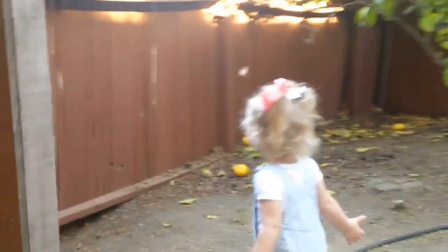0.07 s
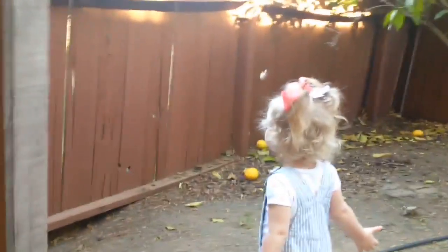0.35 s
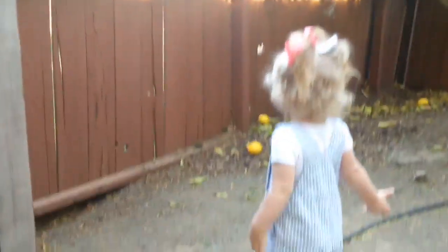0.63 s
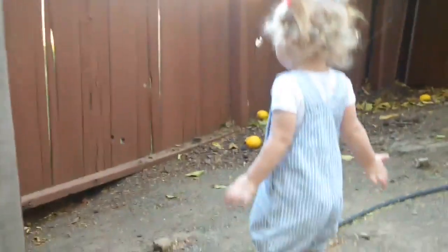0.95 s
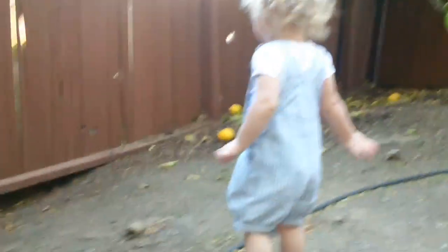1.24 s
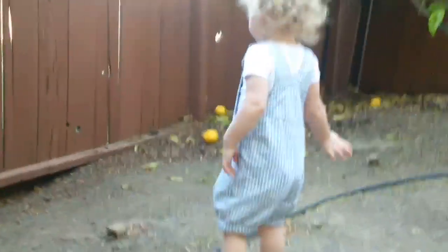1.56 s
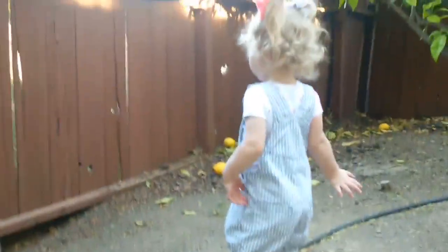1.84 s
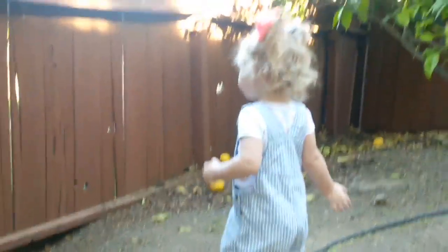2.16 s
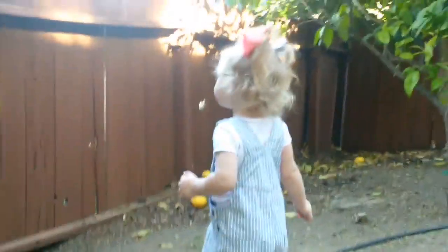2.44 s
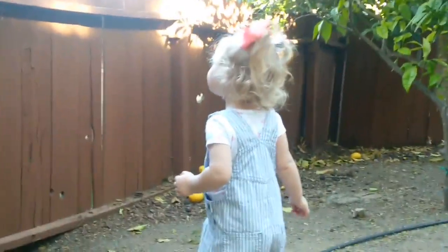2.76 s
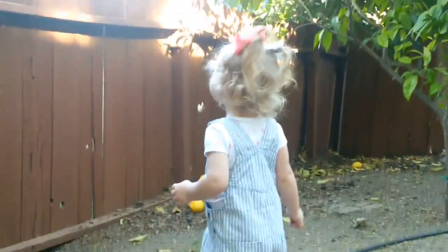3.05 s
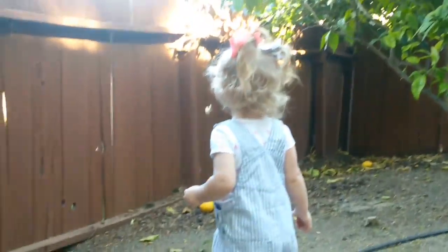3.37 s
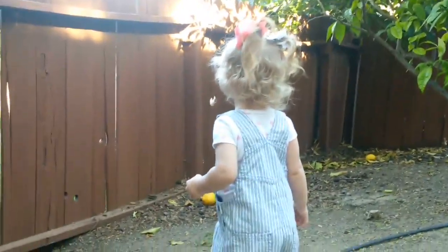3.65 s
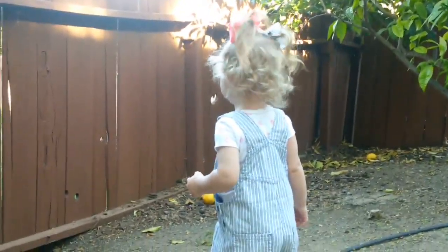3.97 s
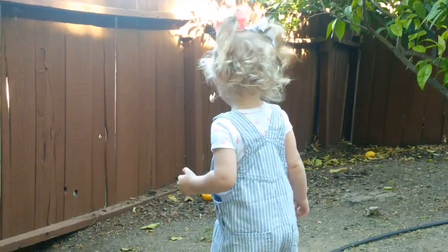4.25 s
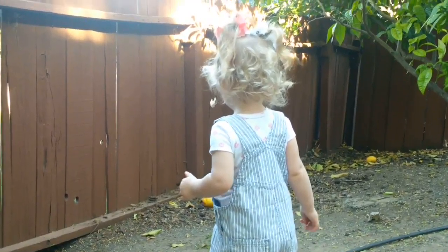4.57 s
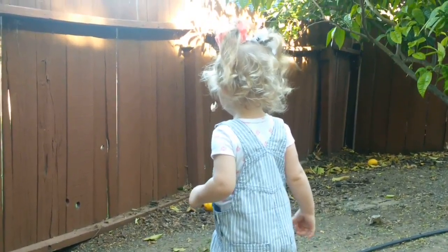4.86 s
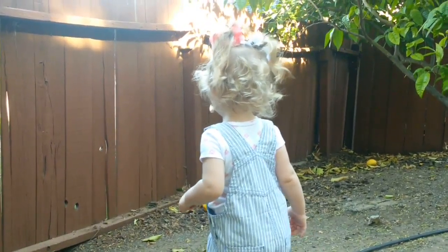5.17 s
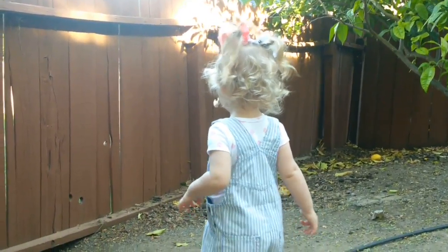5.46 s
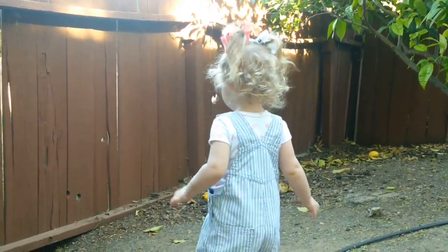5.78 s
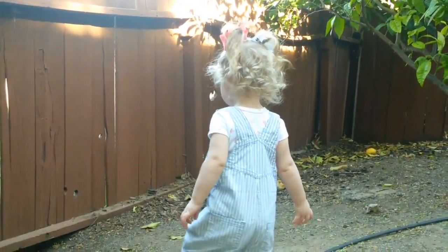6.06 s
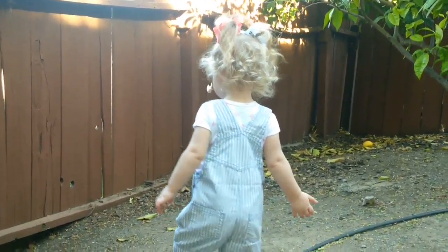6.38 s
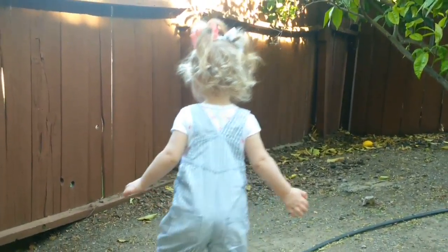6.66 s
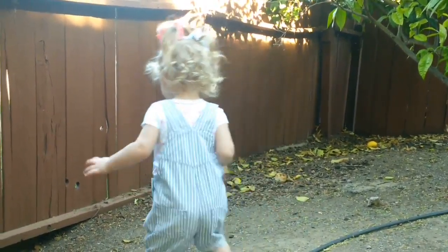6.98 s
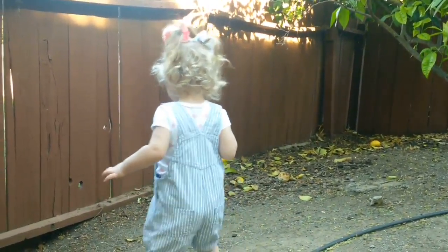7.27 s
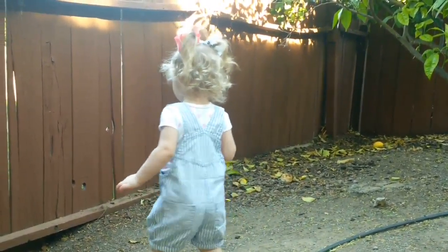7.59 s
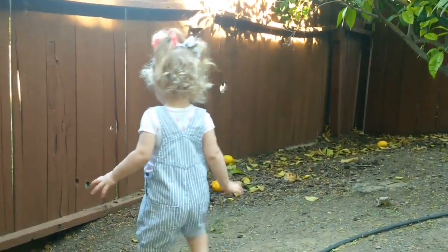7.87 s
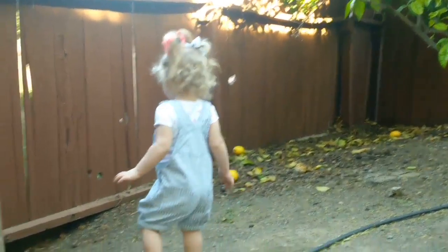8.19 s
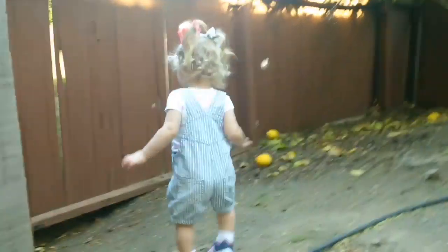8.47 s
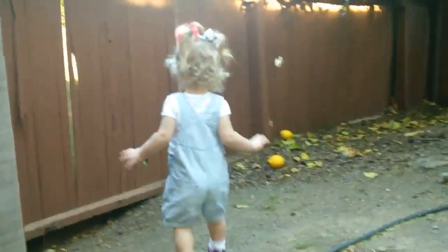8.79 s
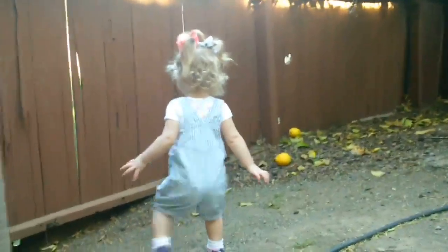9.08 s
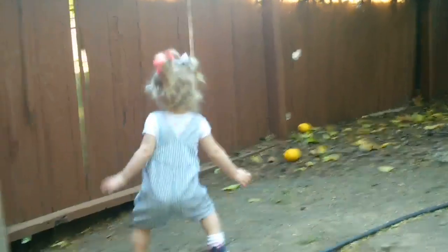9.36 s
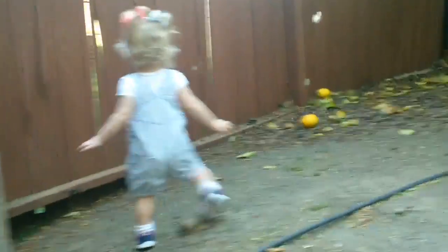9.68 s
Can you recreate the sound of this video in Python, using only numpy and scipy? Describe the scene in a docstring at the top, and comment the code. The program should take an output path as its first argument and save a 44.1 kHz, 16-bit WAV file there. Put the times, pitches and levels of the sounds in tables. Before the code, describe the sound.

Two light taps on wood come first, then a big dog barks from behind a fence, singly and in pairs, each pair trailing into a brief growl. The barks bounce around a residential yard. Close rubbing and sharp clicks on the microphone interrupt, followed by four quick barks, a light tag jingle and a last growl. A toddler's faint steps scuff over grit and dry leaves nearby, while far traffic rumbles low throughout.

```python
"""Distant traffic rumbles around a back yard. Small shoes scuff over grit, and wood is tapped twice.
Behind a wooden fence a big dog barks a pair, two single barks and another pair; fences and house walls
throw the barks back. A hand rubs the microphone, with sharp snaps. The dog barks a run of four and
its collar tag jingles; like both pairs, the run sinks into a short growl. Last, dry leaves crackle
underfoot. Barks and growls are pulses of the vocal folds and rushing air, ringing in throat and muzzle."""
import sys
import numpy as np
from scipy import signal
from scipy.fft import rfft, irfft, next_fast_len
from scipy.io import wavfile
from scipy.ndimage import uniform_filter1d

SR = 44100
rng = np.random.default_rng(int(sys.argv[2]) if len(sys.argv) > 2 else 0)


def materialize(psi):
    """Save the field psi as 16-bit PCM at rate SR to the path in sys.argv[1].

    A 1-D psi becomes a single channel; in a 2-D psi each row is a channel.
    """
    bounded = np.clip(np.atleast_2d(psi).T, -1, 1)
    quanta = np.round(bounded * 32767).astype(np.int16)
    wavfile.write(sys.argv[1], SR, quanta)


N = 437913
TIME = np.arange(N) / SR


def from_db(db):
    """Turn decibels into a number to multiply by."""
    return 10 ** (np.asarray(db) / 20)


def rms_one(x):
    """Scale a sound so that its average power is one."""
    return x / np.sqrt(np.mean(x ** 2) + 1e-20)


def at_hz(points, hz):
    """Read between the rows of a table, with frequency counted in octaves."""
    known_hz, values = np.transpose(points)
    return np.interp(np.log(np.maximum(hz, 1)), np.log(known_hz), values)


def coloured(x, spectrum):
    """Turn each frequency up or down, following rows of Hz and dB."""
    size = x.shape[-1]
    padded = next_fast_len(size)
    gain = from_db(at_hz(spectrum, np.fft.rfftfreq(padded, 1 / SR)))
    return irfft(rfft(x, padded) * gain, padded)[..., :size]


def drift(rate, size):
    """Wander at random around zero, typically by one, turning about `rate` times a second."""
    steps = np.arange(size) * rate / SR
    return np.interp(steps, np.arange(8192), rng.standard_normal(8192), period=8192) * np.sqrt(3 / 2)


def grainy_noise(size, grain_db, rate):
    """Two noises whose levels flicker quickly, like many tiny touches."""
    return rng.standard_normal((2, size)) * from_db(grain_db * drift(rate, size))


def resonate(x, resonances):
    """Let a sound ring at several frequencies (resonances), added with alternating sign."""
    out = 0
    for k, (hz, width_hz, db) in enumerate(resonances):
        r = np.exp(-np.pi * width_hz / SR)
        rung = signal.lfilter([1, 0, -1], [1, -2 * r * np.cos(2 * np.pi * hz / SR), r * r], x + 1e-18)
        out = out + (-1) ** k * from_db(db) * (1 - r * r) / 2 * rung
    return out


def shaped(x, resonances):
    """Keep the sound near each resonance and very little in between."""
    hz = np.fft.rfftfreq(len(x), 1 / SR)
    power = sum(from_db(2 * db) / (1 + 2 * ((hz - centre) / width) ** 2) ** 3
                for centre, width, db in resonances)
    return irfft(rfft(x) * np.sqrt(power), len(x))


def moving_resonance(x, centre_hz, width_hz):
    """One resonance that slides in pitch while its level is held even."""
    turn = np.exp(2j * np.pi * np.cumsum(centre_hz) / SR)
    r = np.exp(-np.pi * width_hz / SR)
    rung = signal.lfilter([1], [1, -2 * r, r * r], x / turn)
    power = uniform_filter1d(np.abs(rung) ** 2, size=900) / 2
    return np.real(rung * turn) / np.sqrt(power + 1e-12)


# How much left and right differ. Each row: frequency in Hz, gain of the differing part in dB.
STEREO_WIDTH = [(30, -22), (80, -22), (400, -15), (1000, -17), (2500, -10), (5000, -7.5), (10000, -1.5)]

def stereo(mid, side):
    """Left and right share `mid` and differ by `side`: alike in the bass, apart in the treble."""
    return mid + coloured(side, STEREO_WIDTH) * np.array([[1], [-1]])


# The tone of far traffic. Each row: frequency in Hz, relative level in dB.
RUMBLE_COLOUR = [(12, -47.5), (20, -2.5), (96, -3), (182, -11.5), (228, -9.5), (678, -16.5), (873, -15),
                 (1710, -33.5), (2910, -40), (8410, -48.5), (16000, -66.5)]
# A far engine. Each row: time in seconds, pitch in Hz, level in dB.
ENGINE_PATH = [(0, 75.4, -59.5), (2.4, 90.6, -57.5), (4.1, 84, -60.5), (5.303, 48.8, -57.5),
               (7.0, 59.4, -68.5), (9.9, 60.8, -60.5)]

def traffic():
    """A steady far rumble with one wavering engine note."""
    s, pitch_hz, db = np.transpose(ENGINE_PATH)
    wavering_hz = np.interp(TIME, s, pitch_hz) * (1 + .012 * drift(10, N))
    phase = 2 * np.pi * np.cumsum(wavering_hz) / SR
    engine = from_db(np.interp(TIME, s, db) + 3.7 * drift(5.7, N)) * np.sin(phase)
    rumble = stereo(*coloured(rng.standard_normal((2, N)), RUMBLE_COLOUR))
    return engine + from_db(-55.5) * rms_one(rumble)


# Shoe scuffs. Each row: middle in seconds, half length in seconds, level in dB, tilt in dB per octave.
SHOE_SCUFFS = [(0.107, 0.042, -63.5, -2), (6.187, 0.02, -56.5, -6.5), (6.518, 0.066, -60, -1),
               (6.686, 0.047, -48, 2.5), (8.901, 0.023, -63.5, -6), (9.533, 0.05, -68.5, 4),
               (9.622, 0.036, -65, 6), (9.76, 0.036, -63.5, 6)]
# The tone of grit before that tilt. Each row: frequency in Hz, relative level in dB.
GRIT_COLOUR = [(300, -44), (1150, -1.5), (2100, -2), (4000, 1), (6500, 0), (9000, -1), (11500, -18),
               (15500, -29)]

def scuffs():
    """Grit crunches under a sole in many tiny slips; a downward tilt makes a step duller."""
    out, t = np.zeros((2, N + SR)), np.arange(-SR // 4, SR // 4) / SR
    for s, half_s, db, tilt_db in SHOE_SCUFFS:
        colour = [(hz, level + tilt_db * np.log2(hz)) for hz, level in GRIT_COLOUR]
        grit = coloured(grainy_noise(len(t), grain_db=2, rate=550), colour)
        at = round(s * SR) + np.round(t * SR).astype(int)
        out[:, at] += from_db(db) * np.exp(-(t / half_s) ** 2) * rms_one(stereo(*grit))
    return out[:, :N]


def rattles(events, resonances, rattle_s, grain_db, size_spread=0):
    """Each event is a quickly dying flurry of touches that sets a small object ringing."""
    out, t = np.zeros((2, N + SR)), np.arange(SR // 3) / SR
    envelope = np.exp(-t / rattle_s) * (1 - np.exp(-t / .00083))
    for s, db in events:
        size = np.exp(size_spread * rng.standard_normal())   # bigger things ring lower
        modes = [(hz / size, width_hz, level_db) for hz, width_hz, level_db in resonances]
        touches = grainy_noise(len(t), grain_db, rate=400)
        ringing = rms_one(stereo(*(shaped(x, modes) for x in touches)))
        at = round(s * SR)
        out[:, at:at + len(t)] += from_db(db) * ringing * envelope
    return out[:, :N]


# Single leaf crackles. Each row: start in seconds, level in dB.
LEAF_CRACKLES = [(7.054, -63), (7.324, -53), (8.567, -61), (9.025, -67), (9.372, -58), (9.575, -67),
                 (9.752, -58.5)]
# How a dry leaf rings. Each row: frequency in Hz, width in Hz, relative level in dB.
LEAF_RING = [(1690, 550, 4.5), (2680, 740, -1.5)]

def leaves(stir_from_s=9.6, stir_to_s=9.9, stir_db=-69.5):
    """Dry leaves crackle underfoot, and walking on stirs up many small crackles at chance moments."""
    stirred = [(stir_from_s + (stir_to_s - stir_from_s) * when, stir_db + 10 * (strength - .5))
               for when, strength in rng.random((24, 2))]
    return rattles(list(LEAF_CRACKLES) + stirred, LEAF_RING, rattle_s=.024, grain_db=3.5, size_spread=.13)


# Jingles of the tag. Each row: start in seconds, level in dB.
TAG_JINGLES = [(7.88, -54.5), (8.150, -48.5), (8.320, -50), (8.844, -61)]
# How the tag rings. Each row: frequency in Hz, width in Hz, relative level in dB.
TAG_RING = [(4860, 200, -4), (8400, 1100, -5), (10220, 400, -0.5), (13000, 3500, -16.5)]

def collar_tag():
    """The tag on the dog's collar rattles and rings brightly."""
    return rattles(TAG_JINGLES, TAG_RING, rattle_s=.05, grain_db=2.5)


# Light taps on wood. Each row: start in seconds, level in dB.
WOOD_TAPS = [(0.770, -45), (1.013, -33)]
# The wood's notes. Each row: frequency in Hz, relative level in dB, seconds to fade by 60 dB.
WOOD_NOTES = [(545, 0, 0.021), (720, 6, 0.0083), (1180, -2, 0.011), (3200, -3.5, 0.007)]

def wood_taps():
    """Every tap sets the wood's notes ringing, each with a strength of its own."""
    out, t = np.zeros(N), np.arange(SR // 2) / SR
    attack = 1 - np.exp(-t / .0006)
    for s, tap_db in WOOD_TAPS:
        at = round(s * SR)
        for hz, db, fade_s in WOOD_NOTES:
            strength = from_db(tap_db + db + rng.normal(0, 1.9)) * rng.choice([-1, 1])
            out[at:at + len(t)] += strength * attack * from_db(-60 * t / fade_s) * np.sin(2 * np.pi * hz * t)
    return out


# How the microphone's casing rings. Each row: frequency in Hz, width in Hz, relative level in dB.
CASING_RING = [(1111, 1940, -9), (2766, 610, -1.5), (3950, 1730, -4), (6600, 1900, -2.5), (9220, 883, -5.5),
               (10790, 950, -4.5), (13850, 3270, -12.5)]

def hand_rub(start_s=6.207, db=-41, grip_s=.0035, hold_s=.17, release_s=.16, release_db=54):
    """Skin sticks and slips on the casing: the hand grips, slides steadily and lets go."""
    during = (TIME > start_s) & (TIME < start_s + hold_s + release_s)
    t = TIME[during] - start_s
    release = np.maximum(t - hold_s, 0) / release_s
    pressure = (1 - np.exp(-t / grip_s)) * from_db(db - release_db * release)
    slips = grainy_noise(len(t), grain_db=4.5, rate=700)
    out = np.zeros((2, N))
    out[:, during] = pressure * rms_one(stereo(*(shaped(x, CASING_RING) for x in slips)))
    return out


# Dry snaps and ticks close by. Each row: start in seconds, peak in dB, gain of the low part in dB.
DRY_SNAPS = [(0.07, -48, 0), (0.12, -47.5, 1), (.536, -52.5, 11), (.711, -56, 14), (0.892, -37.5, 2),
             (1.111, -54.5, -4), (1.7983, -37, -7), (6.242, -25, 4), (6.265, -19, -8.5),
             (6.2815, -11.5, 14.5), (6.369, -26, 8), (6.49, -34, 0), (6.529, -36.5, -10), (7.116, -57, 2.5),
             (7.349, -44.5, 0)]
# The low and the high part of a snap. Each row: frequency in Hz, width in Hz, relative level in dB.
SNAP_LOW = [(1110, 1600, -4), (3020, 370, 15.5)]
SNAP_HIGH = [(4530, 1400, 16), (7030, 4700, 18.9), (9230, 3600, 19.8)]

def snaps(crack_s=.0028, after_db=-18.5, after_s=.036):
    """Each snap is a short crack with a faint ring after it."""
    out, t = np.zeros((2, N)), np.arange(SR // 8) / SR
    envelope = np.exp(-t / crack_s) + from_db(after_db) * np.exp(-t / after_s)
    for s, db, low_db in DRY_SNAPS:
        crack = rng.standard_normal((2, len(t))) * envelope
        snap = stereo(*(resonate(crack, SNAP_HIGH) + from_db(low_db) * resonate(crack, SNAP_LOW)))
        at = round(s * SR)
        out[:, at:at + len(t)] += from_db(db) * snap / np.abs(snap).max()
    return out


# Echoes off fence and house walls. Each row: delay in seconds, level in dB.
YARD_ECHOES = [(.0365, -10.5), (0.0712, -13.5), (.101, -20.5)]
# How long the yard rings on. Each row: frequency in Hz, seconds to fade by 60 dB.
YARD_FADE = [(150, 0.89), (400, 0.39), (800, 0.53), (2000, 0.58), (5000, 0.49), (10000, 0.18)]

def yard(x, direct_db, scatter_db, scatter_fade_s, tail_db):
    """Direct sound, echoes, dense scatter from boards and foliage, and a tail from the houses around."""
    t = np.arange(SR) / SR
    hz, frame_s, noise = signal.stft(rng.standard_normal((2, SR)), SR, nperseg=256)
    dying = from_db(-60 * frame_s / at_hz(YARD_FADE, hz)[:, None])
    tail = signal.istft(noise * dying, SR)[1][:, :SR] * (1 - np.exp(-t / .024))
    scatter = rng.standard_normal((2, SR)) * from_db(-60 * t / scatter_fade_s) * (t > .002)
    bass_cut = signal.butter(2, 750, "high", fs=SR, output="sos")   # long waves pass small things
    scatter = signal.sosfilt(bass_cut, scatter)
    mid, side = (from_db(scatter_db) * rms_one(scatter) + from_db(tail_db) * rms_one(tail)) / np.sqrt(SR)
    mid[0] += from_db(direct_db)
    for delay, db in YARD_ECHOES:
        mid[round(delay * SR)] += from_db(db)
    return signal.fftconvolve(x[None], stereo(mid, side), axes=1)[:, :N]


def vocal_folds(pitch_hz, jitter, jitter_rate, rattle):
    """The folds give unsteady pulses, a puff of air with each, and a clear note an octave higher."""
    size = len(pitch_hz)
    phase = 2 * np.pi * np.cumsum(pitch_hz * (1 + jitter * drift(jitter_rate, size))) / SR
    overtones = sum(np.cos(k * phase) / np.sqrt(k) for k in range(2, 15))
    flapping = 1 + rattle * np.cos(phase / 3 + drift(20, size))   # every third pulse is stronger
    pulses = np.cos(phase) + overtones * flapping
    air = rng.standard_normal(size) * (1 + np.cos(phase)) * flapping
    return pulses, air, np.cos(2 * phase)


# The tone of a growl. Each row: frequency in Hz, width in Hz, relative level in dB.
GROWL_RING = [(109.7, 94, -3.5), (196, 73, 3.5), (382, 390, -1.5), (770, 59, 1), (1222, 88, -8.5),
              (2342, 700, -19.5)]

def growl(t, length, db, start_hz=225, rest_hz=85.1, sink_s=.135, release_s=.13, release_db=17.5):
    """The folds slacken: slow rattling pulses sink in pitch, hold their force and die away."""
    pitch_hz = rest_hz + (start_hz - rest_hz) * np.exp(-t / sink_s)
    pulses, air, _ = vocal_folds(pitch_hz, jitter=.0408, jitter_rate=140, rattle=.22)
    release = np.maximum(1 - (length - t) / release_s, 0)
    return from_db(db - release_db * release) * rms_one(shaped(pulses + 2 * air, GROWL_RING))


def whistling(air, t, count=10, low_hz=2800, high_hz=10000, swell_s=.02, db=-11):
    """Air catches on teeth and lips: brief whistles swell, glide and fade at chance moments."""
    out = rms_one(air)
    for k, (place, moment, glide) in enumerate(rng.random((count, 3))):
        since = t - t[0] - moment * (t[-1] - t[0])
        centre_hz = low_hz * (high_hz / low_hz) ** ((k + place) / count)
        gliding_hz = centre_hz * np.exp(2 * (2 * glide - 1) * since)
        swell = from_db(db) * np.exp(-(since / swell_s) ** 2)
        out = out + swell * moving_resonance(air, gliding_hz, width_hz=260)
    return out


def jaw_ring(source, t, snarl_db, shut_hz=1245, open_hz=1530, lead_s=.018, open_s=.032):
    """A hard snarl opens the jaw, widest just before the bark's top, and that lifts one resonance."""
    widest = np.interp(snarl_db, [-30.5, -25], [0, 1])   # 0 is shut, 1 is wide open
    opening = widest * np.exp(-((t + lead_s) / open_s) ** 2)
    return moving_resonance(source, shut_hz + (open_hz - shut_hz) * opening, width_hz=140)


def varied(resonances):
    """The muzzle takes a slightly different shape in every bark."""
    return [(hz * (1 + rng.normal(0, .015)), width_hz, db + rng.normal(0, 1.5))
            for hz, width_hz, db in resonances]


# How throat and muzzle ring, low to high. Each row: frequency in Hz, width in Hz, relative level in dB.
THROAT_RING = [(386, 215, 0)]
RASP_RING = [(424, 91, 6), (573, 280, -0.5), (785, 320, -8.5)]
SNARL_RING = [(980, 480, 0), (1230, 170, 0.5), (1490, 320, -3), (1849, 430, -4), (2200, 270, -5),
              (2685, 310, -15.5)]
HISS_RING = [(3350, 520, -4), (4100, 700, -9), (4750, 380, 3), (5270, 340, 5), (6000, 900, -4),
             (6850, 800, -8), (8500, 900, -10), (9800, 800, -15), (12500, 3000, -35)]

def bark(t, rise, fall, pitch_hz, crest_s, throat_db, mouth_db, mouth_hz, mouth_s,
         snarl_db, hiss_db, rough):
    """Pitch and force arch to a top at t = 0: a clear voice, a ringing mouth, rasp, snarl and hiss."""
    rising = t < 0
    from_top = np.abs(np.where(rising, t / rise, t / fall))   # 0 at the top, 1 at either end
    arch = 1 - np.where(rising, .4 * from_top ** 1.2, .55 * from_top ** 1.5)   # share of the top pitch
    voice_db = 16.5 * np.log2(arch)   # the voice gains force with its pitch
    breath_db = -np.where(rising, 46, 30) * from_top ** 3.18   # the rush of air is flat in the middle
    pulses, air, octave = vocal_folds(pitch_hz * arch, jitter=.045 * rough, jitter_rate=400, rattle=rough)
    hoarse = pulses + 5 * rough * air

    def through(source, resonances, db):
        """Shape a source by resonances and set its level around the top of the bark."""
        sound = shaped(source, resonances)
        return from_db(db) * sound / sound[from_top < 1 / 3].std()

    def crest_db(at_s):
        """The sound rings out briefly at this moment and is 9 dB lower elsewhere."""
        return 9 * (np.exp(-((t - at_s) / crest_s) ** 2) - 1)

    voice = through(pulses, THROAT_RING, throat_db - 1 + voice_db + crest_db(0))
    voice += from_db(throat_db - 18 + voice_db + breath_db) * octave
    # The mouth follows only part of the swing in force and pitch.
    mouth_gain = from_db(mouth_db + .6 * (voice_db + breath_db) + crest_db(mouth_s))
    mouth = mouth_gain * moving_resonance(hoarse, mouth_hz * arch ** .16, width_hz=81)
    rasp = rough * through(air, RASP_RING, snarl_db + 7 + breath_db)
    jaw = from_db(snarl_db - 6.5 + breath_db) * jaw_ring(hoarse, t, snarl_db)
    snarl = through(hoarse, varied(SNARL_RING), snarl_db - 3.2 + breath_db)
    # Air hisses through the teeth a little longer than the snarl lasts.
    hiss = through(whistling(air, t), varied(HISS_RING), hiss_db + .97 * breath_db)
    return voice + mouth + rasp + jaw + snarl + hiss


def faded(x):
    """The voice sets in and dies away without a click."""
    return x * signal.get_window(("tukey", .08), len(x))


# The barks. Each row: time of the top, rise and fall in seconds, top pitch in Hz, half length of the
# crest (a brief swell) in seconds, relative throat and mouth levels in dB, mouth note in Hz, delay of
# the mouth's crest in seconds, relative snarl and hiss levels in dB, roughness from 0 to 1.
DOG_BARKS = [ (1.382, 0.074, 0.16, 411.2, 0.011, -10, -23.5, 780, 0.0048, -28, -46, 0.55),
             (1.630, .14, 0.12, 412.2, 0.017, -12.5, -18.5, 717, -0.022, -30.5, -50.5, 0.71),
             (3.207, 0.077, 0.1, 414.2, 0.013, -11, -21, 784, -0.013, -28, -45.5, 0.63),
             (4.387, 0.082, 0.09, 424.1, 0.007, -10.5, -22, 760, 0.015, -28, -46, 0.67),
             (5.422, 0.098, 0.07, 443.3, 0.027, -9, -14.5, 755, -0.015, -23, -44.5, .42),
             (5.733, 0.15, 0.07, 378, 0.021, -18, -12, 756, -0.012, -28, -48.5, 0.88),
             (7.470, .075, .13, 411.6, 0.041, -10, -23.5, 732, 0.023, -27.5, -44, 0.53),
             (7.700, .125, 0.12, 403.3, 0.029, -9.5, -20, 696, -0.032, -31, -49, 0.6),
             (7.968, .13, .11, 400.2, 0.02, -10.5, -21, 795, 0.037, -29, -47.5, 0.45),
             (8.228, 0.13, 0.089, 396.4, 0.0049, -11, -21.5, 798.4, -0.0049, -31, -48, 0.55)]
# The growls that end the runs. Each row: start in seconds, length in seconds, relative level in dB.
DOG_GROWLS = [(1.708, 0.35, -42.5), (5.771, 0.39, -46), (8.277, 0.38, -46.5)]

def dog():
    """All barks, and the growls that follow the runs."""
    out = np.zeros(N)
    for s, rise, fall, *voice in DOG_BARKS:
        during = (TIME > s - rise) & (TIME < s + fall)
        out[during] += faded(bark(TIME[during] - s, rise, fall, *voice))
    for s, length, db in DOG_GROWLS:
        during = (TIME > s) & (TIME < s + length)
        out[during] += faded(growl(TIME[during] - s, length, db))
    return out


def scene():
    """The dog a little to the right, the footsteps near, traffic all around."""
    barking = yard(dog(), direct_db=-3.5, scatter_db=-2, scatter_fade_s=.12, tail_db=-13)
    barking *= from_db([[-.3], [.3]])   # left, right
    return barking + collar_tag() + scuffs() + leaves() + hand_rub() + snaps() + wood_taps() + traffic()


def record(dry, cutoff_hz=15800):
    """The highest treble is cut off steeply."""
    return signal.sosfilt(signal.ellip(10, .1, 80, cutoff_hz, fs=SR, output="sos"), dry)


dry = scene()
out = record(dry)
materialize(out)
```